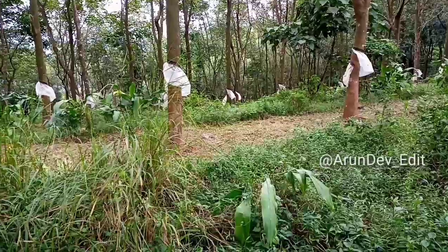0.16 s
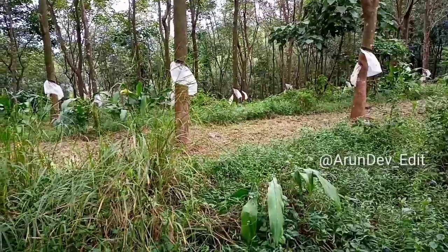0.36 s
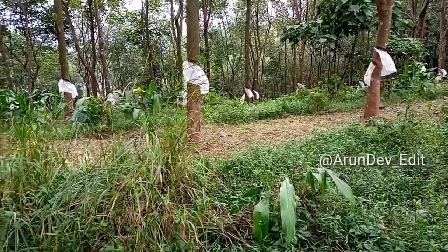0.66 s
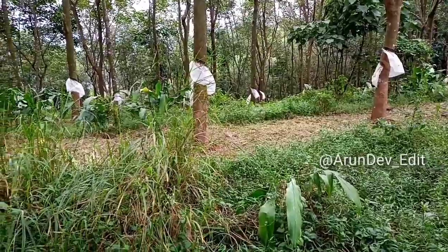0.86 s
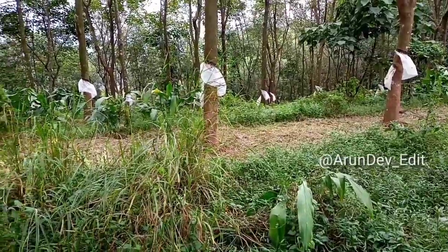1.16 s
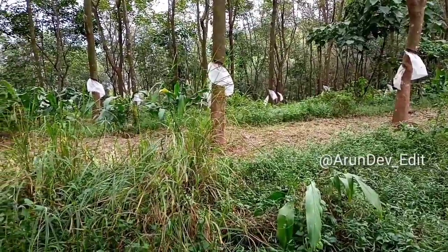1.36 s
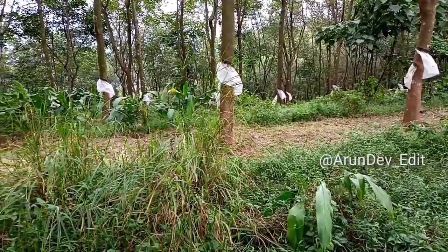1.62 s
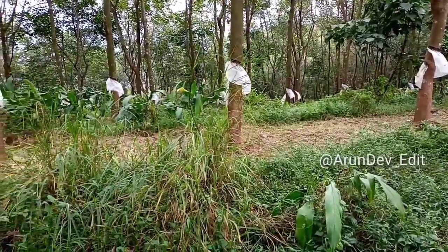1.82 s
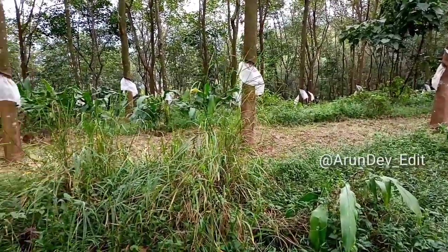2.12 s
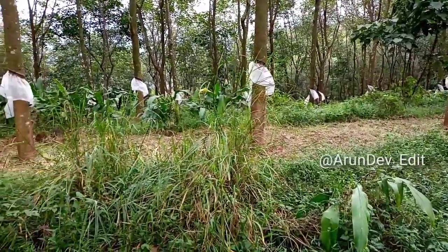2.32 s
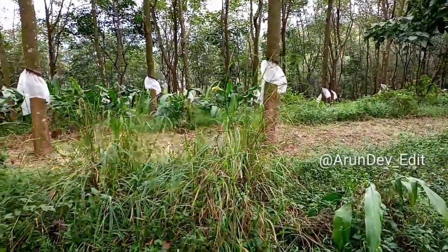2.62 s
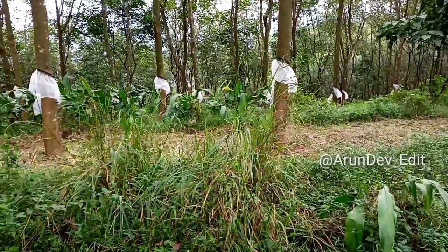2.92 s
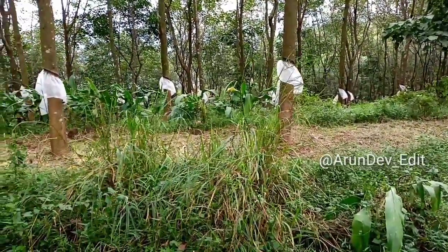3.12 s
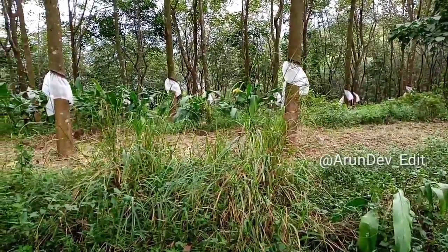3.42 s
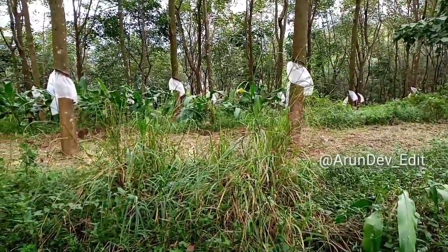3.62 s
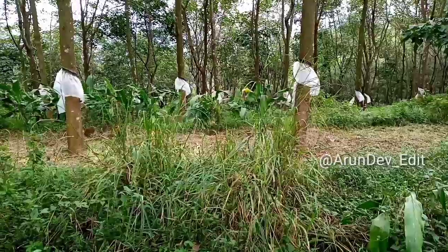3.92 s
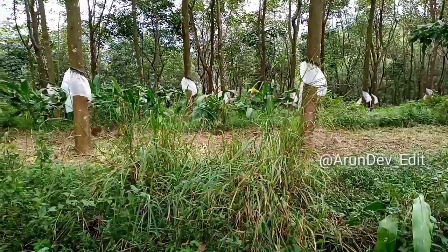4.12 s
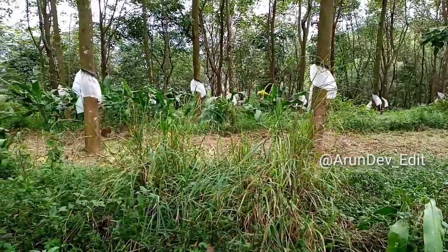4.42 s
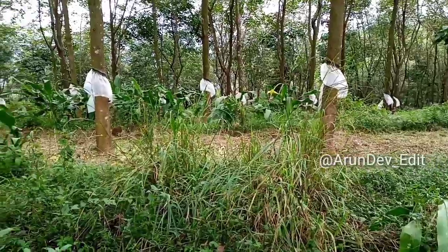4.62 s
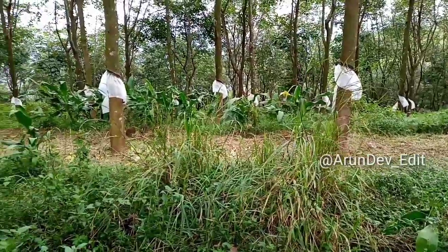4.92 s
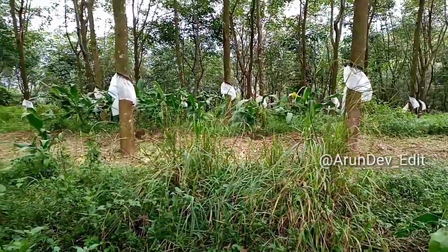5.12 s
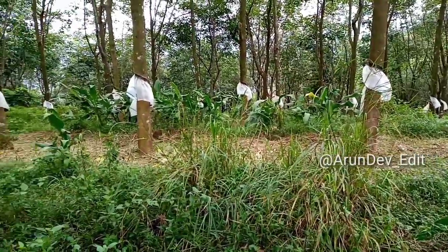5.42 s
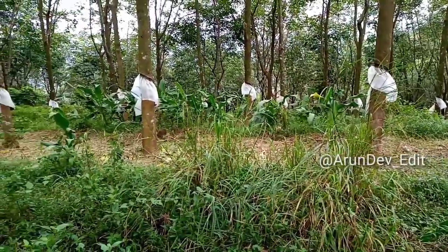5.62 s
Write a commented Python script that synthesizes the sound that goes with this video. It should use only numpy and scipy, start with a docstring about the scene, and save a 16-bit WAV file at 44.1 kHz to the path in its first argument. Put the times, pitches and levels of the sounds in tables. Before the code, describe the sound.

Shrill, metallic insect song fills open woodland, picked up by a hand-held microphone with low soft air noise. A higher and a lower cicada first pulse brief interleaved notes over many far singers and a very high rasp. Midway there is a sudden sharp jolt with a low thump. The ending is a continuous quivering trill with longer, slightly falling whines, a very faint cricket chirp and slight handling bumps.

```python
"""Short notes of a high cicada and the soft rough buzz of a lower one sound near, over a far insect chorus.
The lower one soon sings too; most notes fall slightly, and the higher one ends in a trill in this tree plantation.
Each buckles its tymbal ribs in regular strokes: a stack of partials with side lines one stroke rate apart.
Shaped noise makes the air, chorus and tree echoes; short tone swells make a faint cricket's chirps.
A pressure step and brief pips are a sharp jolt and soft bumps reaching the hand-held microphone."""
import sys
import numpy as np
from scipy import signal
from scipy.fft import rfft, irfft
from scipy.io import wavfile
from scipy.ndimage import uniform_filter1d, map_coordinates

SR = 44100
rng = np.random.default_rng(int(sys.argv[2]) if len(sys.argv) > 2 else 0)


def materialize(psi):
    """Save the field psi as 16-bit PCM at rate SR to the path in sys.argv[1].

    A 1-D psi becomes a single channel; in a 2-D psi each row is a channel.
    """
    bounded = np.clip(np.atleast_2d(psi).T, -1, 1)
    quanta = np.round(bounded * 32767).astype(np.int16)
    wavfile.write(sys.argv[1], SR, quanta)


def attenuation_scalar(level_db):
    """Turn a level in dB into a linear amplitude multiplier (20 dB per decade)."""
    decades = np.asarray(level_db, float) / 20
    return 10 ** decades


N = 254016
TIME = np.arange(N) / SR


def unit(x):
    """Normalization: scales a signal to rms 1."""
    return x / np.sqrt(np.mean(x ** 2) + 1e-20)


def along(points, hz):
    """Logarithmic frequency scale: interpolates (frequency [Hz], value) points on it."""
    f, v = np.transpose(points)
    return np.interp(np.log(hz + 1), np.log(f + 1), v)


def curves(rows):
    """Linear interpolation: one curve over the samples for each column after the time."""
    s, *cols = np.transpose(rows)
    return [np.interp(TIME, s, c) for c in cols]


def wobble(rate):
    """Slow random modulation: a smooth curve through about rate knots a second."""
    return map_coordinates(rng.standard_normal(8192), [TIME * rate])


def band(hz, centre_hz, width_hz):
    """Resonance: a bell-shaped response, applied twice."""
    return 1 / (1 + (2 * (hz - centre_hz) / width_hz) ** 2) ** 2


def throb(rate_hz, start, depth_db):
    """Amplitude modulation: a regular swelling of level, at its top at time start."""
    return attenuation_scalar(depth_db * (np.cos(2 * np.pi * rate_hz * (TIME - start)) - 1.5))


def hiss(gain, patchy_db):
    """Filtered noise: rms 1, coloured by gain(Hz), with time-frequency patches of random level."""
    hz, t, z = signal.stft(rng.standard_normal(N + 1024), SR, nperseg=1024)
    field = uniform_filter1d(rng.standard_normal(z.shape), size=5, axis=0)
    field = uniform_filter1d(field, size=5, axis=1)
    shaped = z * gain(hz)[:, None] * attenuation_scalar(patchy_db * unit(field))
    return unit(signal.istft(shaped, SR, nperseg=1024)[1][:N])


def pips(rows):
    """Gaussian tone bursts: short swells of one pitch each."""
    total = 0
    for s, db, hz, length in rows:
        since = TIME - s
        total = total + attenuation_scalar(db) * np.exp(-(2 * since / length) ** 2) * np.cos(2 * np.pi * hz * since)
    return total


# spectral shape of the air: (frequency [Hz], relative level per Hz [dB])
AIR_SPECTRUM = [(25, -4), (45, 8.5), (70, 0), (110, 2.2), (200, -3.5), (350, -11.5), (1000, -15),
                (1700, -8.5), (3200, -10), (5400, -10), (10800, -21), (12800, -13), (16000, -19)]


def air():
    """Stationary broadband noise: far rumble and the steady hiss of forest and microphone."""
    return attenuation_scalar(-65.5) * hiss(lambda hz: attenuation_scalar(along(AIR_SPECTRUM, hz)), patchy_db=2.5)


# blurred partials of the far singers: (centre [Hz], width [Hz], relative level [dB])
FAR_BANDS = [(2358, 375, -23.5), (4594, 580, -28.5), (7064, 1140, -21), (8280, 670, -21.5),
             (9144, 1530, -5.5), (10440, 800, -42), (11700, 2200, -33), (13800, 800, -42)]


def far_singers():
    """Incoherent superposition: many singers blur into noise bands at the same partials."""
    return hiss(lambda hz: sum(attenuation_scalar(db) * band(hz, c, w) for c, w, db in FAR_BANDS), patchy_db=1.0)


def rasping_insect():
    """Nested amplitude modulation: a very high insect rasps four pulses to a chirp."""
    chirps = throb(rate_hz=18, start=.04, depth_db=1.7)
    pulses = throb(rate_hz=72, start=.058, depth_db=1.7)
    uneven = attenuation_scalar(2.2 * wobble(110))
    return unit(chirps * pulses * uneven * hiss(lambda hz: band(hz, 15600, 2300), patchy_db=1))


# flares of the scratchy hiss: (time [s], level added [dB])
FLARES = [(2.68, -57), (4.78, -59)]


def scratchy_hiss():
    """Random modulation of band noise: a faint scratchy hiss that flares briefly."""
    steady_db, flare_s = -67.5, 0.037
    scratch = unit(attenuation_scalar(3.5 * wobble(25)) * hiss(lambda hz: band(hz, 6250, 900), patchy_db=2.5))
    flares = sum(attenuation_scalar(db) * np.exp(-((TIME - s) / flare_s) ** 2) for s, db in FLARES)
    return (attenuation_scalar(steady_db) + flares) * scratch


# slow swell of the chorus: (time [s], far singers' level [dB], highest insect's level [dB])
CHORUS_SWELL = [(0, -39, -53.5), (1.5, -40, -54.5), (3, -39.5, -54.5), (4.5, -41, -57.5), (5.76, -42, -53)]


def chorus():
    """Superposition: the far singers and the rasping insect swell slowly, with the scratchy hiss."""
    far_db, rasp_db = curves(CHORUS_SWELL)
    return attenuation_scalar(far_db) * far_singers() + attenuation_scalar(rasp_db) * rasping_insect() + scratchy_hiss()


# clear chirps of a faint cricket: (time [s], peak [dB], pitch [Hz], length [s])
CRICKET_CHIRPS = [(4.66, -81, 3490, .04), (4.76, -72, 3490, 0.027), (4.84, -76, 3520, 0.052),
                  (4.885, -65, 3530, 0.019), (4.915, -67, 3466, 0.017), (5.0, -74, 3450, .04)]
# fainter, uneven chirping: (centre [Hz], width [Hz], level before the swing [dB], swing [dB])
UNEVEN_CRICKET = (3490, 64, -85.5, 6)


def crickets():
    """Narrow-band sound: a few clear tone bursts over randomly modulated narrow noise."""
    hz, width_hz, db, swing_db = UNEVEN_CRICKET
    uneven = attenuation_scalar(db + swing_db * wobble(18)) * hiss(lambda f: band(f, hz, width_hz), patchy_db=1.5)
    return pips(CRICKET_CHIRPS) + uneven


# the jolt's pressure step: (time [s], height [dB])
JOLT_STEP = (2.5339, -18.5)
# soft bumps and ticks: (time [s], peak [dB], pitch [Hz], length [s])
SOFT_BUMPS = [(1.40, -68.5, 304.6, 0.021), (2.075, -57.5, 302, 0.0047), (3.975, -62, 128.7, 0.012),
              (4.17, -45, 90, 0.015), (4.19, -58, 101.8, 0.015), (4.585, -59.5, 188, 0.016),
              (4.63, -53.5, 183, .02), (4.642, -58, 248, 0.014), (4.682, -59, 213.2, 0.013),
              (4.72, -72, 411, 0.018), (5.452, -32.5, 6620, 0.0024), (5.4525, -31, 7420, 0.00095),
              (5.505, -48, 428.3, 0.0036), (5.509, -59.5, 353, 0.019)]


def handling():
    """Step excitation: the jolt is a sudden rise of pressure, the bumps are short tone bursts."""
    start, step_db = JOLT_STEP
    step = 1 - np.exp(-np.clip(TIME - start, 0, None) * 25000)
    return attenuation_scalar(step_db) * step + pips(SOFT_BUMPS)


# echoes among trunks: (frequency [Hz], time to die by 60 dB [s])
TRUNK_DECAY = [(1000, 0.68), (9000, 0.94), (15000, 0.097)]


def trees(x):
    """Reverberant decay: convolution with a noise tail in which each frequency dies at its own speed."""
    hz, t, z = signal.stft(rng.standard_normal(SR // 2), SR, nperseg=256)
    decay = attenuation_scalar(-60 * t / along(TRUNK_DECAY, hz)[:, None])
    tail = signal.istft(z * decay, SR, nperseg=256)[1]
    return signal.fftconvolve(x, tail / np.linalg.norm(tail))[:N]


def song(notes, voice):
    """Frequency glide: each note glides straight and arches in level.

    The three low partials follow the rate and the time, and fade along the note."""
    arch_db = 1.5  # the bright lines are this much weaker at a note's ends than at its middle
    warm_s = 3  # the voices change until then
    mid_hz, partials = voice
    played = []
    for s, length, from_hz, to_hz, db, under_db in notes:
        middle_hz = (from_hz + to_hz) / 2
        note = []
        for u, hz, arch in ((0, from_hz, -arch_db / 2), (.5, middle_hz, arch_db / 2), (1, to_hz, -arch_db / 2)):
            low_db = [level + tilt * (hz - mid_hz) + grow * min(s, warm_s) - fade * u
                      for level, tilt, grow, fade in partials]
            note.append((s + u * length, hz, db + arch, under_db + arch, *low_db))
        played.append(note)
    return played


# trill and buzz, levels from the 4th partial: (line under the 4th [dB], 2nd partial [dB], 3rd partial [dB])
ROUGH_LINES = (-2.5, -31, -25.5)


def rough(rows):
    """Fixed spectral balance: one long note whose 2nd, 3rd and under lines hang on the 4th partial."""
    under, second, third = ROUGH_LINES
    return [[(s, hz, db, db + under, low_db, db + second, db + third) for s, hz, db, low_db in rows]]


def held(notes, edge):
    """Gating: 1 while a note sounds, with soft edges of edge seconds."""
    gate = 0
    for note in notes:
        inside = np.minimum(TIME - note[0][0], note[-1][0] - TIME)
        gate = gate + np.clip(inside / edge + .5, 0, 1)
    return gate


# weaker lines, levels from the strong lines' mean before faint_db is added:
# (partial, strokes above it, level with nine ribs [dB], level with eight ribs [dB])
FAINT_LINES = [(1, -1, -36, -34), (1, 1, -29, -36), (2, -1, -29, -25), (2, 1, -29, -23), (3, -2, -24, -22),
               (3, -1, -19, -24), (3, 1, -18, -18), (4, -3, -14, -12), (4, -2, -6, -8), (4, 1, 0, -1),
               (4, 2, -10, -12), (5, -1, -27, -20), (5, 0, -15, -13), (5, 1, -28, -25), (6, -1, -33, -26),
               (6, 0, -25, -22)]
# a ground echo weakens strong lines in one narrow band: (centre [Hz], width [Hz], depth [dB])
GROUND_NOTCH = (2270, 30, 8)


def cicada(notes, gate, count, waver_hz, waver_rate, flutter_db, faint_db):
    """Periodic excitation: count ribs click in each stroke, so lines stand at whole partials of the
    click rate and at steps of 1 / count beside them."""
    notch_hz, notch_width_hz, notch_db = GROUND_NOTCH
    rate_hz, *strong_db = curves(sum(notes, []))
    phase = 2 * np.pi * np.cumsum(rate_hz + waver_hz * wobble(waver_rate)) / SR
    lines = []
    for order, db in zip([4, 4 - 1 / count, 1, 2, 3], strong_db):
        drift_db = 1.5 * wobble(14)  # slow fading of each line
        notch = notch_db * band(order * rate_hz, notch_hz, notch_width_hz)
        lines.append((order, db + drift_db - notch))
    effort_db = np.mean(strong_db, axis=0) + faint_db
    for partial, strokes, nine_db, eight_db in FAINT_LINES:
        line_db = nine_db if count == 9 else eight_db
        scatter_db = 4 * wobble(25)  # the weak lines break up
        lines.append((partial + strokes / count, effort_db + line_db + scatter_db))
    # every line reaches the microphone by its own mix of paths, so each flutters alone
    total = 0
    for order, db in lines:
        total = total + np.sqrt(2) * attenuation_scalar(db + flutter_db * wobble(30)) * np.sin(order * phase)
    return gate * total


# the lower singer's rough buzz as it warms up, levels before modulation:
# (time [s], click rate [Hz], 4th partial [dB], 1st partial [dB])
WARMING_ROWS = [(0, 2132, -48, -71), (.9, 2158, -53, -75), (1.9, 2184, -58, -97), (2.6, 2200, -75, -85)]


def warming_buzz():
    """Random frequency and amplitude modulation: eight ribs buzz with no steady pitch."""
    notes = rough(WARMING_ROWS)
    gate = attenuation_scalar(3.2 * wobble(22.7)) * held(notes, 0.013)
    return cicada(notes, gate, count=8, waver_hz=40.3, waver_rate=400, flutter_db=1, faint_db=1)


# the higher singer's rough buzz as it tires, levels before the throb:
# (time [s], click rate [Hz], 4th partial [dB], 1st partial [dB])
TIRING_ROWS = [(4.0, 2435, -70, -68), (4.6, 2446, -59, -67), (5.3, 2469, -57, -62), (5.76, 2437, -72, -65)]


def tiring_buzz():
    """Deep amplitude modulation: nine ribs buzz with no steady pitch, throbbing in step with the trill."""
    notes = rough(TIRING_ROWS)
    gate = throb(rate_hz=17.5, start=3.86, depth_db=14) * held(notes, .1)
    return cicada(notes, gate, count=9, waver_hz=62.5, waver_rate=140, flutter_db=6, faint_db=6)


# the higher singer's closing trill, levels before the throb:
# (time [s], click rate [Hz], 4th partial [dB], 1st partial [dB])
TRILL_ROWS = [(3.45, 2399, -33, -51), (3.75, 2355, -35, -59), (3.85, 2372, -35, -55),
              (4.05, 2357, -30, -64), (4.12, 2385, -40, -59), (4.5, 2336, -31, -63), (5.0, 2350, -37, -61),
              (5.76, 2335, -35, -74)]


def closing_trill():
    """Periodic amplitude modulation: one long nine-rib note throbs regularly and wavers in pitch."""
    notes = rough(TRILL_ROWS)
    gate = throb(rate_hz=17.5, start=3.86, depth_db=6.2) * held(notes, 0.017)
    return cicada(notes, gate, count=9, waver_hz=14, waver_rate=70, flutter_db=4.5, faint_db=4)


# the lower singer's notes, levels before arch, drift, notch and flutter: (start [s], length [s],
# click rate at the start [Hz], at the end [Hz], 4th partial [dB], line under it [dB])
LOW_NOTES = [(.16, .09, 2290, 2291, -35, -39), (.38, .08, 2202, 2204, -40, -45),
             (.57, .09, 2303, 2305, -34, -40), (.8, .09, 2227, 2228, -34, -42),
             (1.0, .08, 2310, 2313, -35, -42), (1.2, .09, 2249, 2250, -40, -41),
             (1.41, .11, 2320, 2323, -32, -42), (1.6, .1, 2268, 2265, -35, -40),
             (1.79, .1, 2216, 2226, -32, -39), (1.96, .11, 2319, 2321, -39, -43),
             (2.13, .1, 2287, 2283, -36, -38), (2.3, .1, 2232, 2243, -34, -46),
             (2.48, .1, 2326, 2327, -34, -44), (2.63, .14, 2299, 2298, -42, -40),
             (2.78, .15, 2265, 2265, -29, -40), (2.95, .13, 2320, 2326, -32, -40),
             (3.11, .14, 2303, 2293, -37, -37), (3.27, .12, 2279, 2277, -34, -38),
             (3.42, .13, 2322, 2316, -36, -42), (3.55, .25, 2318, 2283, -33, -38),
             (3.84, .13, 2250, 2251, -34, -34), (4.0, .57, 2292, 2240, -33, -36),
             (4.59, .55, 2295, 2238, -35, -39), (5.17, .52, 2296, 2239, -34, -37),
             (5.71, .04, 2297, 2297, -49, -47)]
# middle click rate [Hz], then for the 1st, 2nd and 3rd partial:
# (level at that rate and time 0 [dB], tilt [dB per Hz of rate], growth [dB per s], loss along a note [dB])
LOW_PARTIALS = (2286, [(-64.5, 0.039, 3.2, 0.58), (-68, -0.016, 2.62, -0.75), (-61, -0.044, .1, 1)])


def low_song():
    """Harmonic lines with stroke-rate sidebands: the lower singer buckles eight ribs a stroke."""
    notes = song(LOW_NOTES, LOW_PARTIALS)
    return cicada(notes, held(notes, 0.019), count=8, waver_hz=2.68, waver_rate=70,
                  flutter_db=2.07, faint_db=-2.8)


# the higher singer's notes, levels before arch, drift, notch and flutter: (start [s], length [s],
# click rate at the start [Hz], at the end [Hz], 4th partial [dB], line under it [dB])
HIGH_NOTES = [(.02, .13, 2377, 2371, -39, -48), (.19, .11, 2337, 2335, -33, -48),
              (.36, .11, 2411, 2411, -37, -51), (.53, .12, 2376, 2368, -38, -36),
              (.69, .13, 2342, 2338, -41, -48), (.86, .11, 2416, 2409, -38, -50),
              (1.03, .12, 2377, 2365, -38, -38), (1.2, .11, 2339, 2334, -39, -48),
              (1.36, .14, 2405, 2402, -34, -42), (1.52, .12, 2366, 2362, -40, -48),
              (1.7, .11, 2340, 2334, -36, -52), (1.86, .14, 2400, 2396, -38, -46),
              (2.03, .15, 2365, 2354, -33, -39), (2.19, .11, 2333, 2327, -33, -48),
              (2.34, .15, 2397, 2392, -43, -44), (2.5, .14, 2363, 2355, -37, -47),
              (2.67, .26, 2392, 2353, -39, -44), (2.98, .24, 2390, 2358, -40, -35),
              (3.28, .15, 2378, 2369, -37, -43)]
# middle click rate [Hz], then for the 1st, 2nd and 3rd partial:
# (level at that rate and time 0 [dB], tilt [dB per Hz of rate], growth [dB per s], loss along a note [dB])
HIGH_PARTIALS = (2370, [(-52, .005, -.2, 4), (-60, -.01, -1.3, 3.5), (-56, .01, -.8, 3)])


def high_song():
    """Harmonic lines with stroke-rate sidebands: the higher singer buckles nine ribs a stroke."""
    notes = song(HIGH_NOTES, HIGH_PARTIALS)
    return cicada(notes, held(notes, 0.029), count=9, waver_hz=2.68, waver_rate=70,
                  flutter_db=1.1, faint_db=0.0)


def singers():
    """Superposition: the songs, trill and buzzes of the two near cicadas add."""
    return high_song() + low_song() + closing_trill() + tiring_buzz() + warming_buzz()


def scene():
    """Direct and reverberant sound: near singers and their echoes join the chorus, cricket, air and hand."""
    near = singers()
    echo = attenuation_scalar(-8.5) * trees(near)
    return (near + echo + chorus() + crickets() + air() + handling())[None]


def low_pass(x):
    """Removes everything above the highest recorded frequency."""
    return signal.sosfilt(signal.butter(12, 16850, fs=SR, output="sos"), x)


def record(dry):
    """Band limiting: a steep low cut turns the pressure step into a click with a slow swing after it,
    and a sharp upper limit removes the highest treble."""
    top_hz = 15480
    low_cut = signal.butter(4, 85, "highpass", fs=SR, output="sos")
    spectrum = rfft(signal.sosfilt(low_cut, dry))
    passed = np.fft.rfftfreq(N, 1 / SR) < top_hz
    mix = irfft(spectrum * passed, N)
    return low_pass(mix)


dry = scene()
out = record(dry)
materialize(out)
```